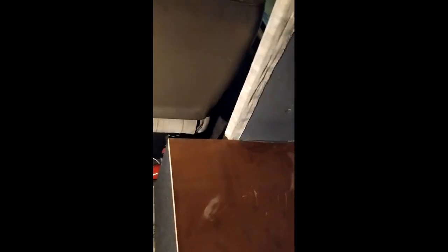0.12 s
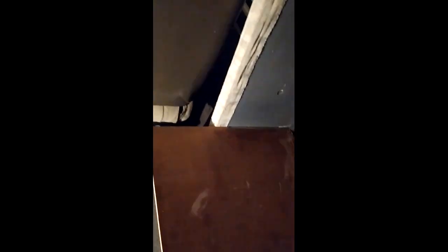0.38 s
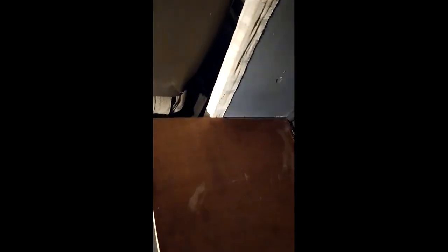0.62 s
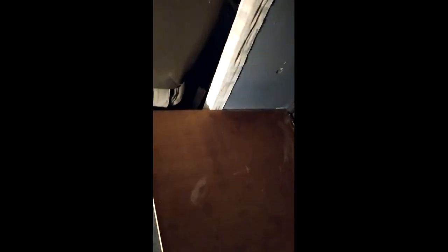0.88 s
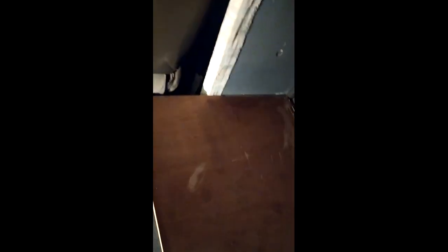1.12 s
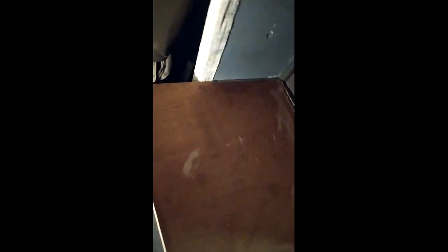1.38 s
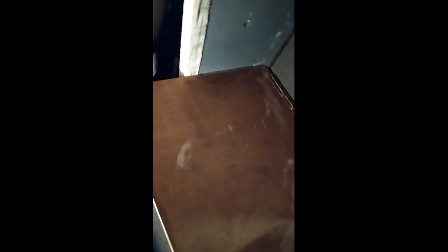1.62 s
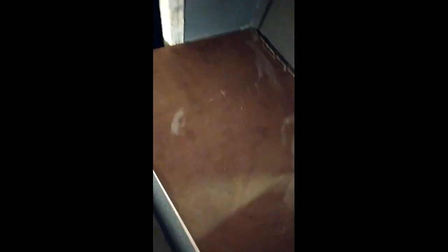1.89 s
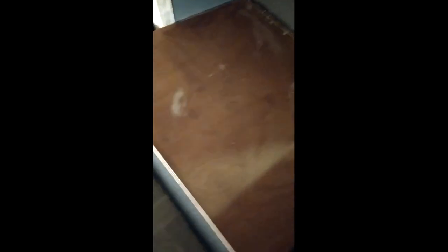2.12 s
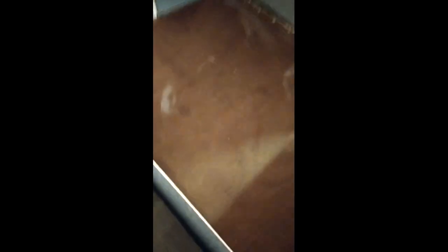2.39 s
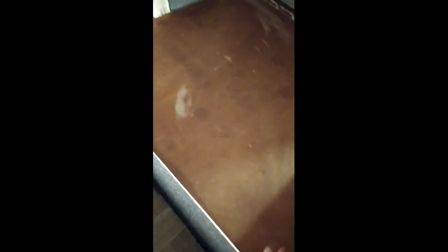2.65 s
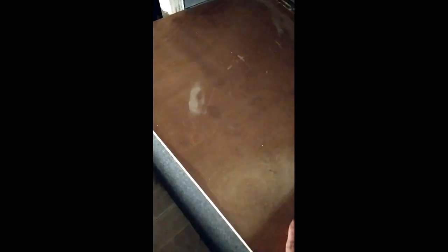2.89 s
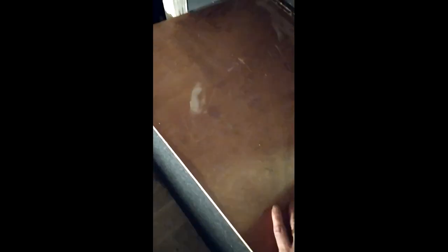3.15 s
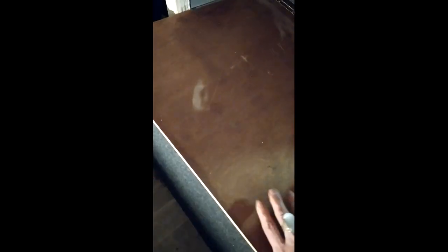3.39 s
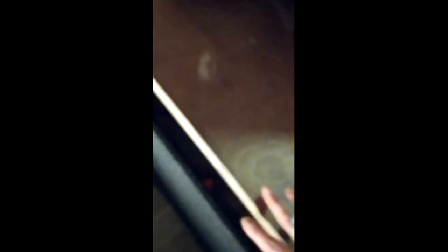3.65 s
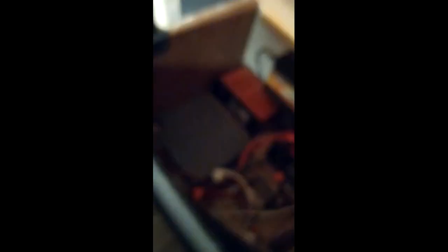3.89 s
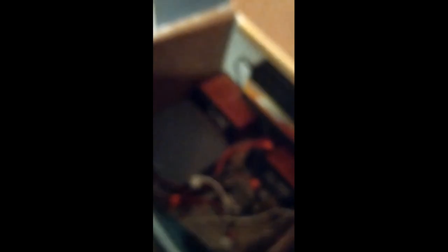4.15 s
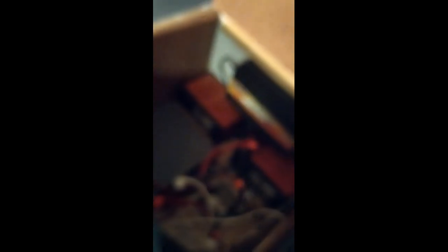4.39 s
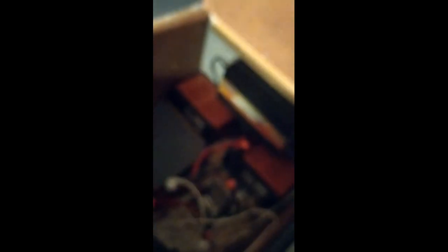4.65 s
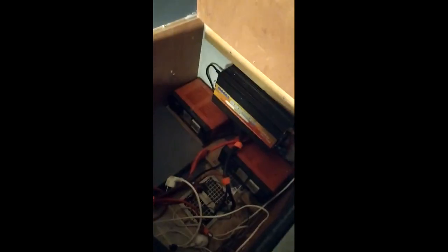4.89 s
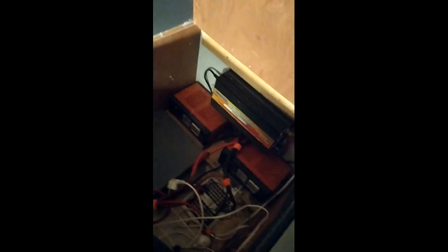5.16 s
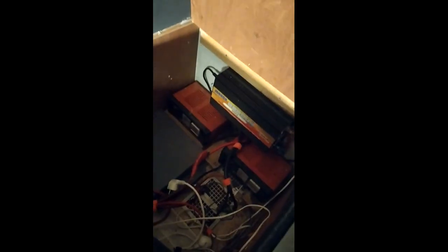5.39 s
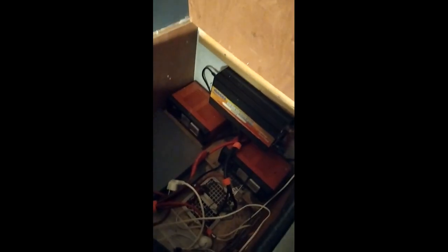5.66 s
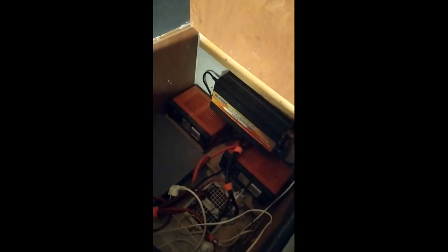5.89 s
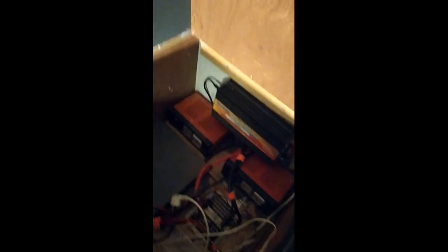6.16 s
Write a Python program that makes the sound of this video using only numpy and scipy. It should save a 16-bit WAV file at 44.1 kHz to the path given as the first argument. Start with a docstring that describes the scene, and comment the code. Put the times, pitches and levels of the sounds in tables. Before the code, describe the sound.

A quiet small camper interior, heard close through a hand-held stereo microphone with low cabin hum and soft hiss. At 0 to 0.5 s there is faint rubbing and a slight narrow hum. A light double-contact tap on wood comes at 0.6 s, then a hard, hollow knock at 0.8 s, the loudest event, with a crack, tiny metallic buzz and short boxy tail. Near silence lasts until 1.9 s, when dry ticks, low bumps and microphone clicks appear, leaning left around 2.2 to 2.5 s. From 2.9 s a hand brushes plywood in short airy strokes; a bright tick snaps at 3.65 s. From 3.7 to 5.2 s the lid drags on its frame in irregular low groans, gritty scrapes and thumps, strongest near 4 s, with a soft woody knock at 4.75 s. It quiets, then a small scuff and dull bump come around 5.95 s before faint room noise ends it.

```python
"""Cabinet knocks and a sliding lid

Inside a small camper a wooden cabinet is knocked twice, then a hand slides over a plywood lid and swings it
open. Each knock rings the modes of the wood, with a crack, a rattle and a short cabin tail around it. Random
slips of the lid on its frame drive its low modes and thumps; dense fine grains make the close hiss of skin and
cloth. The hand-held microphone pair sways in a low noise band, with small ticks and clicks near it. Quiet cabin
hum and microphone hiss lie behind, and a faint narrow hum and hiss precede the knocks."""
import sys
import numpy as np
from scipy import signal
from scipy.fft import rfft, irfft
from scipy.io import wavfile
from scipy.ndimage import uniform_filter1d

SR = 44100
rng = np.random.default_rng(int(sys.argv[2]) if len(sys.argv) > 2 else 0)


def wav_record(signal):
    """Record a signal, one row per channel, as 16-bit PCM in the file named by sys.argv[1]."""
    frames = np.transpose(np.atleast_2d(signal))
    bounded = np.clip(frames, -1, 1)
    # unit amplitude maps onto the largest positive 16-bit level
    quanta = np.round(bounded * 32767).astype(np.int16)
    wavfile.write(sys.argv[1], SR, quanta)


def boost(x):
    """Linear amplitude factor 10**(x/20) for a level x in decibels (scalar or array-like)."""
    u = np.asarray(x, float) / 20
    return 10 ** u


N = 276810

# Knocks on wood. Each row: time in seconds, level in dB, body below 500 Hz in relative dB,
# crack above 3 kHz in relative dB, left-right in dB, left lag in ms, rattle in relative dB.
KNOCKS = [(0.583, -24.5, -12, -16.5, 10, -0.13, -17.5), (0.596, -29, 1, -18, 1, -0.39, -3.5),
          (0.786, -11.5, -3, -8, 1.5, -0.27, -23.5), (4.745, -31, 4.5, 0.5, 0.5, -0.164, -13),
          (5.959, -47.5, 8.5, 7.5, 1, -0.41, -1.5)]
# Modes of the door panel, of the smaller slat that is hit first and of the lid's edge.
# Each row: pitch in Hz, level in dB, T60 in seconds.
DOOR_MODES = [(102.4, -13.5, 0.42), (237, -6.5, 0.22), (232, -35.5, 1.0), (280, -4.5, 0.15),
              (330, -8, 0.15), (401.6, -8, 0.17), (571, -10, 0.2), (672, -3.5, 0.17), (736, -14, 0.16),
              (832, -11.5, 0.1), (870, -18.5, 0.17), (1011, -16, 0.25), (1114, -9, 0.11), (1344, -6, 0.091),
              (1585, -14, 0.11), (1840, -14, 0.17), (1985, -20, 0.11), (2130, -20.5, 0.11),
              (2360, -23.5, 0.25), (2780, -18, 0.11), (3040, -25.5, 0.11), (3430, -26.5, 0.16),
              (4328, -25, 0.08), (4840, -8.5, 0.09), (4630, -20, 0.08), (416, -43, 0.93)]
SLAT_MODES = [(152, -16, 0.22), (248.8, -15, 0.15), (411.5, -23.5, 0.15), (626, -17.5, 0.15),
              (820, -17, 0.19), (910, -12, 0.08), (1007, -2, 0.13), (1110, -10, 0.08), (1590, -25, 0.06),
              (1780, -18, 0.07), (1870, -9, 0.06), (2050, -14, 0.04), (2230, -16, 0.045), (3070, -19, 0.04),
              (3780, -22, 0.03), (4470, -21, 0.03), (5600, -16, 0.012), ]
EDGE_MODES = [(108.7, -11.5, 0.57), (258, -4.5, 0.22), (437, -1, 0.1), (578, -5.5, 0.15), (670, -7, 0.074),
              (894, -6, 0.092), (1120, -12, 0.11), (2310, -22, 0.079), (3400, -5, 0.11), (4650, -13, 0.058)]
# What each knock hits; the last, soft blow rings only the two lowest modes of the edge.
STRUCK = [SLAT_MODES, SLAT_MODES, DOOR_MODES, EDGE_MODES, EDGE_MODES[:2]]
# Decay of the cabin. Each row: frequency in Hz, T60 in seconds.
CABIN_T60 = [(80, 0.36), (210, 0.35), (560, 0.15), (1470, 0.13), (3880, 0.096), (10200, 0.13)]
# Colour of the cabin tail. Each row: frequency in Hz, level in dB per Hz.
CABIN_COLOUR = [(50, -36), (80, -8.5), (161, -11), (676, -10.5), (1210, -17), (4990, -31.5), (10500, -57.5),
                (15000, -76.5)]
# Fixed modes of the lid. Each row: pitch in Hz, width in Hz, level in dB.
# The first is the thump's mode, used without its level; the others make the grit.
LID_MODES = [(95.87, 2.6, -6), (350, 14, 7), (456, 61, -2), (467.4, 11.6, 8.5), (559, 87, -2),
             (678.4, 13.5, 2.5), (785, 84, -6), (1114, 157, -7), (1890, 490, -8)]
# The lid's edge drags on its frame. Each row: start in seconds, hold in seconds, board hum in dB,
# pitch of the strongest board mode in Hz, grit in dB.
DRAGS = [(0.006, 0.064, -53, 252, -54), (0.154, 0.065, -61, 208, -68), (0.24, 0.28, -78.5, 265.3, -66.5),
         (1.914, 0.063, -66, 245.4, -62), (2.023, 0.097, -80, 280, -69.5), (2.201, 0.018, -66, 204, -65),
         (2.294, 0.045, -63, 200, -66.5), (2.564, 0.3, -78, 280, -73), (2.954, 0, -60.5, 200, -57),
         (3.023, 0.087, -71, 164, -66.5), (3.27, 0.22, -73, 189, -70), (3.523, 0.076, -59.5, 189, -66.5),
         (3.735, 0.072, -55.5, 170, -59.5), (3.85, 0.056, -45, 183, -58.5), (3.957, 0.1, -40, 193, -53.5),
         (4.116, 0.2, -57, 189.6, -64), (4.334, 0.036, -64.5, 258.0, -65),
         (4.473, 0.076, -45, 207.7, -54.5), (4.608, 0.105, -46, 256.7, -57), (4.756, 0.022, -54, 258, -50),
         (4.927, 0.038, -47, 286, -45.5), (5, 0.0094, -39.5, 199.4, -52), (5.122, 0.12, -57, 256, -61.5),
         (5.363, 0.17, -74, 250, -75.5), (5.854, 0.13, -60, 240, -70), (5.983, 0, -44, 201, -50),
         (6.012, 0.029, -53, 296, -80), ]
# Low thumps of the lid: the slips drive its lowest mode. Each row: start in seconds, hold in seconds, level in
# dB.
THUMPS = [(-0.003, 0.01, -51), (0.173, 0.066, -58.5), (1.938, 0.013, -53), (2.078, 0, -62),
          (2.185, 0.13, -54), (2.416, 0.013, -63.5), (2.864, 0.19, -61.5), (3.468, 0.34, -66),
          (3.852, 0.0044, -48), (3.95, 0.24, -51), (4.317, 0.1, -57.5), (4.542, 0.19, -51),
          (4.783, 0.3, -55.5), (5.152, 0.26, -64.5), (5.234, 0.084, -57), (5.528, 0.016, -64.5),
          (5.9, 0.0, -56), (5.998, 0.03, -45.5), (6.106, 0.15, -64)]
# Strokes of skin and cloth, then strokes that start and stop with a jerk. Each row: start in seconds,
# hold in seconds, hiss in dB, coarse part in relative dB, fine part in relative dB.
STROKES = [(0.001, 0.06, -56, -3, 4.5), (0.127, 0.41, -65, -1.5, 4), (1.636, 0.42, -74, -6, 1),
           (1.972, 0.084, -67.5, -0.5, 3), (2.091, 0.18, -74.5, -1.5, 8.5), (2.478, 0.44, -67.5, -12.5, -5),
           (2.882, 0.057, -53, -8.5, -2.5), (3.021, 0.11, -57.5, -9, -3.5), (3.171, 0.062, -53, -12, -1),
           (3.282, 0.054, -53.5, -8, -4.5), (3.389, 0.037, -57.5, -2.5, -8.5), (3.5, 0.31, -67, -4.5, -1),
           (3.659, 0.1, -54.5, -8, -4.5), (3.741, 0.032, -53.5, 1.5, -15), (3.819, 0.044, -48, -1, -8),
           (3.9, 0.035, -59.5, 4, -4), (3.976, 0.079, -55.5, -2.5, -2), (4.07, 0.11, -57.5, -1, -5),
           (4.247, 0.07, -54, -3.5, -10), (4.343, 0.063, -68, -4, -10), (4.453, 0.11, -51, -4.5, -9),
           (4.665, 0.058, -48.5, -4, -8), (4.788, 0.05, -59, -2, -4), (4.918, 0.074, -49, -0.5, -5.5),
           (5.06, 0.065, -63.5, -7, -4), (5.175, 0.063, -55.5, -1, -7), (5.39, 0.088, -67.5, -2, -13),
           (5.598, 0.014, -63, -7, 4), (5.68, 0.17, -70.5, -18.5, 4), (5.864, 0.029, -57, -4, -1),
           (5.988, 0.0029, -58.5, 2.5, -12)]
JERKS = [(2.034, 0.0096, -63, -1, -6), (2.304, 0.11, -67, -10, 8), (2.645, 0.038, -69.5, -8, 2),
         (4.605, 0.032, -51, -7, 3.5), (5.946, 0.029, -44.5, -6.5, -4)]
# Colour of the sliding. Each row: frequency in Hz, level in dB per Hz.
SLIDING_COLOUR = [(710, -25.5), (1200, -12.5), (2400, -9), (2900, -6), (3500, -5.5), (4700, -6), (8180, 0),
                  (13200, -12.5), (15000, -11), (15800, -2)]
# Where the sliding is heard. Each row: time in seconds, left-right in dB, left lag in ms.
SLIDING_SIDE = [(0, 2.5, -0.12), (1.5, 2, 0.25), (2.13, 11.5, -0.47), (2.36, 34, -0.38), (2.43, 33.5, 0.14),
                (2.46, 18.5, -0.42), (2.81, 25.5, -0.13), (2.89, 0.5, 0.26), (3.02, 7, 0.31), (3.3, 2, .27),
                (4.7, 2.5, 0.29), (5.2, 2, 0.47), (6.1, 1, 0.39), (6.27, 10.5, .35)]
# Higher board modes that sing out briefly while the lid drags, then high rings around the knocks: a loose #
# metal fitting buzzing, and the door panel's mode near 4.8 kHz ringing on just after it is hit. # Each row:
# start in seconds, hold in seconds, level in dB, pitch in Hz.
OVERTONES = [(2.933, 0.045, -60.5, 350), (2.94, 0.025, -73, 496), (3.843, 0.017, -61, 773),
             (3.94, 0.053, -49, 340), (4.468, 0.071, -57.5, 468), (4.52, 0.055, -60.5, 672),
             (4.904, 0.054, -56, 478)]
BUZZES = [(0.695, 0.035, -75, 4768), (0.798, 0.006, -46.5, 4840), (0.87, 0.043, -65.5, 4757)]
# Deeper sways of the hand-held microphone. Each row: start in seconds, hold in seconds, level in dB.
SWAYS = [(1.94, 0.016, -53.5), (2.085, 0.0074, -61), (2.264, 0.02, -48.5), (2.42, 0.01, -60.5),
         (6.043, 0.11, -63)]
# Dry ticks of fingers and small parts near the microphone. Each row: time in seconds, level in dB,
# pitch in Hz, left-right in dB.
TICKS = [(1.14, -57.5, 5280, 16), (1.885, -46, 310, 1), (1.887, -51, 1200, 4), (1.902, -44.5, 340, 0),
         (1.906, -45, 1580, -2), (1.931, -56, 606, 3), (1.948, -47.5, 1680, 3), (1.975, -47, 3260, 5),
         (2.373, -50.5, 9800, 28), (2.427, -53.5, 9000, 24), (2.93, -49, 610, 7), (3.615, -59, 1000, 2),
         (3.658, -32.5, 9060, -5.5), (4.449, -54, 6800, 20), (4.603, -47, 8000, 4), (5.1, -43, 8400, 2.5),
         (5.367, -55, 6030, 0), (5.943, -50, 6950, -1)]
# Bare clicks of a finger on the microphone's housing. Each row: time in seconds, peak in dB,
# upper reach in Hz, twice the left-right difference in dB.
CLICKS = [(2.21, -52, 1600, 22), (2.235, -55, 2200, 12), (2.246, -46, 2320, 30), (2.257, -51, 4500, 20),
          (2.304, -44, 2960, 33), (2.317, -46, 1200, 31), (2.408, -54, 1500, 28)]
# A faint narrow hum and hiss before the knocks. Each row: start in seconds, hold in seconds, level in dB.
WHISTLE = [(0.266, 0.28, -67)]
# Its bands. Each row: pitch in Hz, width of each of two filter passes in Hz, level in dB.
WHISTLE_BANDS = [(391, 120, 1), (5830, 910, 1)]
# Colour of the cabin air and microphone hiss. Each row: frequency in Hz, level in dB per Hz.
AIR_COLOUR = [(18, -28.5), (30, -9.5), (59, 2.5), (203, -16), (238, -12), (353, -14.5), (402, -10.5),
              (447, -21), (883, -22.5), (1210, -23.5), (1570, -24.5), (2800, -22.5), (9000, -25.5),
              (15800, -31.5)]
# Its likeness at the two microphones. Each row: frequency in Hz, left-right correlation (-1 to 1).
AIR_LIKENESS = [(60, -0.3), (240, 0.62), (950, 0.051), (3770, -0.59), (15000, 0.75)]

DRAG_RISE_DB_PER_S, DRAG_FALL_DB_PER_S = 204.5, 176.5
JERK_RISE_DB_PER_S, JERK_FALL_DB_PER_S = 1500, 704


def rms_one(x):
    """Scale to unit rms."""
    return x / np.sqrt(np.mean(x ** 2) + 1e-20)


def in_time(rows):
    """Columns of a table joined by straight lines in time."""
    s, *columns = np.transpose(rows)
    return [np.interp(np.arange(N) / SR, s, c) for c in columns]


def at_hz(points, hz):
    """A spectrum read on a log-frequency axis."""
    point_hz, value = np.transpose(points)
    return np.interp(np.log(hz), np.log(point_hz), value)


def drift(rate_hz):
    """Slow random wavering of spread 1: noise through a two-pole low-pass, made at every 40th sample."""
    r = np.exp(-2 * np.pi * rate_hz * 40 / SR)
    slow = signal.lfilter([1], [1, -2 * r, r * r], rng.standard_normal(N // 40 + 2002))[2000:]
    return np.interp(np.arange(N) / 40, np.arange(len(slow)), rms_one(slow))


def band(x, low_hz, high_hz, order=2):
    """Butterworth band-pass."""
    edges = [low_hz, min(high_hz, 0.45 * SR)]
    return signal.sosfilt(signal.butter(order, edges, "band", fs=SR, output="sos"), x)


def coloured(x, spectrum):
    """Noise given a spectrum in dB per Hz."""
    hz = np.maximum(np.fft.rfftfreq(x.shape[-1], 1 / SR), 10)
    return irfft(rfft(x) * boost(at_hz(spectrum, hz)), x.shape[-1])


def resonance(x, hz, width_hz):
    """Two-pole resonance with gain 1 on top."""
    r = np.exp(-np.pi * width_hz / SR)
    poles = [1, -2 * r * np.cos(2 * np.pi * hz / SR), r * r]
    return signal.lfilter([(1 - r * r) / 2, 0, (r * r - 1) / 2], poles, x)


def grains(per_s, spread_db):
    """Random stick-slip clicks, a few much larger than the rest."""
    sizes = boost(spread_db * np.minimum(rng.exponential(1, N), 5)) * rng.choice([-1, 1], N)
    return sizes * (rng.random(N) < per_s / SR) + 1e-18


def placed(x, pan_db, lag_ms):
    """A source to one side: left-right level difference, and left later by the lag."""
    n, half = np.arange(x.shape[-1]), lag_ms / 1000 * SR / 2
    left = np.interp(n - half, n, x) * boost(pan_db / 2)
    right = np.interp(n + half, n, x) * boost(-pan_db / 2)
    return np.array([left, right])


def evened(x, span_s, depth):
    """Steady pressure: the level is partly evened out over a short span; rms 1."""
    return rms_one(x / uniform_filter1d(x ** 2 + 1e-12, int(span_s * SR)) ** (depth / 2))


def swells(start_s, hold_s, rise_db_per_s, fall_db_per_s):
    """One row of power per gesture: a rise to its start, a hold, a fall; read every 32 samples."""
    t = np.arange(0, N + 32, 32) / SR
    end_s = start_s + np.maximum(hold_s, 0)
    before = np.maximum(start_s[:, None] - t, 0)
    after = np.maximum(t - end_s[:, None], 0)
    bend_db = 3002 * (before + after) ** 2      # ever steeper away from the hold
    drop_db = rise_db_per_s * before + fall_db_per_s * after + bend_db
    return boost(-2 * np.minimum(drop_db, 900))


def every_sample(coarse):
    """From every 32nd sample to all."""
    return np.interp(np.arange(N) / 32, np.arange(len(coarse)), coarse)


def loudness(shapes, db):
    """Gain of overlapping gestures, added as powers."""
    return every_sample(np.sqrt(boost(2 * db) @ shapes))


def struck_modes(modes, t):
    """Damped sines at both microphones; neighbouring modes beat, so each ring wavers."""
    hz, level_db, t60 = np.transpose(modes)[:, :, None]
    dying = boost(level_db + 2 * rng.standard_normal(hz.shape) - 60 * t / t60)
    knots = rng.standard_normal((len(hz), 199))      # 120 per second
    waver_db = 3.5 * np.array([np.interp(t * 120, np.arange(199), row) for row in knots])
    # the two microphones hear a mode in ever less related phase up to 1200 Hz
    apart = np.minimum(hz / 1200, 1) ** 2 * rng.uniform(-np.pi / 3, np.pi / 3, hz.shape)
    rings = np.array([np.sum(dying * boost(waver_db) * -np.sin(2 * np.pi * hz * t + ear * apart), axis=0)
                      for ear in (1, -1)])
    strong_start = 1 + 0.3 * np.exp(-t / 0.012)      # the first swings are the strongest
    contact = 1 - np.exp(-t / 0.0005)      # the contact takes a moment
    return rings * strong_start * contact


def cabin_tail(body_db, crack_db, t):
    """Diffuse noise that dies band by band, with a weaker and longer later part."""
    edges = 70 * 2 ** np.arange(0, 8, 0.5)
    blow_colour = [(300, body_db), (1100, 0.0004), (5000, crack_db + 15)]
    white, tail = rng.standard_normal((2, 2, len(t))), 0
    for k, (low, high) in enumerate(zip(edges, edges[1:])):
        hz = np.sqrt(low * high)
        fall_db = -60 * t / at_hz(CABIN_T60, hz)
        dying = boost(fall_db) + boost(-22 + fall_db / 3.3)
        dying = dying * (1 - np.exp(-t / 0.00031))
        gain = boost(at_hz(blow_colour, hz) + at_hz(CABIN_COLOUR, hz))
        mid, side = band(white[k % 2], low, high) * dying * gain
        tail = tail + mid + side * [[1], [-1]] * min(hz / 900, 1)      # long waves reach both mics alike
    return tail


def knocks():
    """Each blow rings the modes of what it hits, cracks, rattles on and leaves a diffuse cabin tail."""
    out, t = np.zeros((2, N + SR)), np.arange(SR) / SR
    # the panel gives under the blow: one short swing in, out and back
    give = -np.sin(2 * np.pi * 340 * t) * np.sin(np.pi * np.minimum(t / 0.0044, 1))
    for (s, level_db, body_db, crack_db, pan_db, lag_ms, rattle_db), modes in zip(KNOCKS, STRUCK):
        rings = struck_modes(modes, t)
        crack = band(rng.standard_normal((2, len(t))), 1900, 11000) * np.exp(-t / 0.0033) * boost(crack_db)
        # after the first contact the loose parts rattle on
        contacts = grains(400, 4.1)[:SR // 5] * boost(rattle_db) * np.exp(-t[:SR // 5] / 0.018)
        contacts[0] = 1
        blow = signal.fftconvolve(boost(-3) * rings + crack, [contacts])[:, :SR]
        left, right = blow + boost(-8 + body_db) * give
        direct = np.array([placed(left, pan_db, lag_ms)[0], placed(right, pan_db, lag_ms)[1]])
        at = round(s * SR)
        out[:, at:at + len(t)] += boost(level_db) * (direct + boost(16.5) * cabin_tail(body_db, crack_db, t))
    return out[:, :N]


def lid():
    """Slips of the edge on its frame drive the board: a main mode whose pitch is set by the grip, and fixed modes."""
    s, hold, hum_db, grip_hz, grit_db = np.transpose(DRAGS)
    drags = swells(s, hold, DRAG_RISE_DB_PER_S, DRAG_FALL_DB_PER_S)
    hum_gain, grit_gain = loudness(drags, hum_db), loudness(drags, grit_db)
    leading = np.argmax(boost(2 * hum_db)[:, None] * drags, axis=0)      # the strongest drag sets the pitch
    hum_hz = uniform_filter1d(every_sample(grip_hz[leading]), int(0.0091 * SR) + 1)      # short glides
    s, hold, thump_db = np.transpose(THUMPS)
    thump_gain = loudness(swells(s, hold, 161, 88), thump_db)

    slips = grains(900, 3.2)
    thump_mode = rms_one(resonance(slips, *LID_MODES[0][:2]))
    thump_noise = rms_one(band(rng.standard_normal(N), 52, 134))
    thump = evened(0.78 * thump_mode + 0.72 * thump_noise, 0.68, 0.82)

    turn = np.exp(2j * np.pi * np.cumsum(hum_hz) / SR)
    r = np.exp(-np.pi * 15 / SR)      # 15 Hz wide
    hum = np.real(turn * signal.lfilter([1], [1, -r], slips / turn))      # a resonance that follows the pitch
    wide_hum = rms_one(band(slips, 192, 360))
    hum = evened(rms_one(band(hum, 170, 325)) + 0.23 * wide_hum, 0.031, 1.0)

    grit = rms_one(sum(boost(db) * resonance(slips, hz, width_hz) * (-1) ** k
                       for k, (hz, width_hz, db) in enumerate(LID_MODES[1:])))
    board = thump_gain * thump + hum_gain * hum + grit_gain * grit
    # noise of opposite sign at the two microphones widens grit and thump
    wide_grit = boost(-6) * grit_gain * rms_one(band(rng.standard_normal(N), 250, 900))
    wide_thump = boost(-14) * thump_gain * rms_one(band(rng.standard_normal(N), 30, 90))
    return placed(board, 0.16, 0.19) + (wide_grit + wide_thump) * [[1], [-1]]


def sliding():
    """Dense fine grains; each stroke has its own hiss, coarse part and fine part, scratchy and patchy band by band."""
    s, hold, hiss_db, coarse_db, fine_db = np.transpose(STROKES + JERKS)
    count = len(STROKES)
    smooth = swells(s[:count], hold[:count], 234, 250)
    jerky = swells(s[count:], hold[count:], JERK_RISE_DB_PER_S, JERK_FALL_DB_PER_S)
    strokes = np.vstack([smooth, jerky])
    pan_db, lag_ms = in_time(SLIDING_SIDE)
    scattered = np.array([rms_one(grains(6000, 1.3)) for ear in (1, -1)])
    direct = placed(rms_one(grains(3000, 3.2)), 0, lag_ms)
    both = coloured(direct + 1.67 * scattered, SLIDING_COLOUR)
    pressure_db = 0.64 * drift(4.2) - 0.5 * drift(105)
    parts = [((1186, 1815, 2510, 3680, 4880), coarse_db),
             ((4930, 6400, 8000, 10080, 11150), 0),
             ((11300, 13300, 18000), fine_db)]
    out = 0
    for edges, part_db in parts:
        patchy = sum(band(both, low, high, order=3) * boost(2.5 * drift(20.6))
                     for low, high in zip(edges, edges[1:]))
        out = out + rms_one(patchy) * loudness(strokes, hiss_db + part_db)
    return out * boost(pressure_db + np.array([pan_db, -pan_db]) / 2)


def overtones(rows, width_hz, rise_db_per_s):
    """Board modes or high rings near the knocks: each is noise in one narrow resonance, pressed evenly."""
    s, hold, db, hz = np.transpose(rows)
    shapes = swells(s, hold, rise_db_per_s, DRAG_FALL_DB_PER_S)
    white, out = rng.standard_normal(N), 0
    for pitch_hz, level_db, shape in zip(hz, db, shapes):
        tone = resonance(resonance(white, pitch_hz, width_hz), pitch_hz, 4 * width_hz)
        out = out + evened(tone, 0.04, 0.93) * boost(level_db) * every_sample(np.sqrt(shape))
    return out


def sways():
    """The microphone swings in the hand: a narrow deep rumble."""
    s, hold, db = np.transpose(SWAYS)
    deep = evened(band(rng.standard_normal(N), 52, 67), 0.054, 0.54)
    return deep * loudness(swells(s, hold, 240, 240), db)


def ticks():
    """Each tick is a snap spread around its pitch and a short rough ring."""
    out, t = np.zeros((2, N + SR)), np.arange(2000) / SR
    noises = rng.standard_normal((len(TICKS), 2, len(t)))
    for (s, level_db, hz, pan_db), (white, rough) in zip(TICKS, noises):
        tone = np.sin(2 * np.pi * hz * t) + 0.6 * rms_one(band(rough, hz / 1.03, hz * 1.06, order=1))
        t60 = max(0.011, 9 / hz)      # at least nine cycles
        ring = tone * boost(1.5 - 60 * t / t60)
        snap = band(white * np.exp(-t / 0.00015), hz / 6.8, hz * 1.8)
        snap = snap * np.sqrt(SR / 3 / hz) * boost(2)      # a narrower band is raised to match
        at = round(s * SR)
        out[:, at:at + len(t)] += boost(level_db) * placed(ring + snap, pan_db, 0.175)
    return out[:, :N]


def clicks():
    """Each click is one dulled push, a band-passed impulse with no added ring."""
    out = np.zeros((2, N))
    for s, peak_db, top_hz, pan_db in CLICKS:
        push = band(np.arange(600) == 9, 250, top_hz)      # impulse at sample 9
        at = round(s * SR) - 9
        out[:, at:at + len(push)] += boost(peak_db) * placed(push / np.abs(push).max(), pan_db / 2, 0)
    return out


def whistle():
    """Noise in a few narrow bands, held for a moment."""
    s, hold, db = np.transpose(WHISTLE)
    white = rng.standard_normal(N)
    tones = sum(boost(level_db) * rms_one(resonance(resonance(white, hz, width_hz), hz, width_hz))
                for hz, width_hz, level_db in WHISTLE_BANDS)
    return placed(tones * loudness(swells(s, hold, 150, 300), db), 0.59, 0.2)


def cabin_air():
    """Quiet cabin hum and microphone hiss; how alike the two sides are depends on frequency."""
    mid, side = rfft(coloured(rng.standard_normal((2, N)), AIR_COLOUR))
    hz = np.maximum(np.fft.rfftfreq(N, 1 / SR), 10)
    alike = np.clip(at_hz(AIR_LIKENESS, hz), -1, 1)
    both = np.sqrt(1 + alike) * mid + np.sqrt(1 - alike) * side * [[1], [-1]]
    return boost(-65.5) * rms_one(irfft(both, N))


def scene():
    """All sources in the cabin, from the wood to the air."""
    board_tones = overtones(OVERTONES, width_hz=20, rise_db_per_s=DRAG_RISE_DB_PER_S)
    fitting = overtones(BUZZES, width_hz=150, rise_db_per_s=JERK_RISE_DB_PER_S)
    wood = knocks() + lid() + board_tones + fitting
    hand = sliding() + sways() + ticks() + clicks()
    return wood + hand + whistle() + cabin_air()


def band_limit(x):
    """A steep low-pass at the top of the band."""
    return signal.sosfilt(signal.butter(12, 16550, fs=SR, output="sos"), x)


def record(dry):
    """The microphones cut the deepest bass and the top."""
    low_cut = signal.butter(4, 40, "high", fs=SR, output="sos")
    top_cut = signal.cheby2(10, 50, 16100, fs=SR, output="sos")
    mix = signal.sosfilt(np.vstack([low_cut, top_cut]), dry)
    return band_limit(mix)


dry = scene()
out = record(dry)
wav_record(out)
```